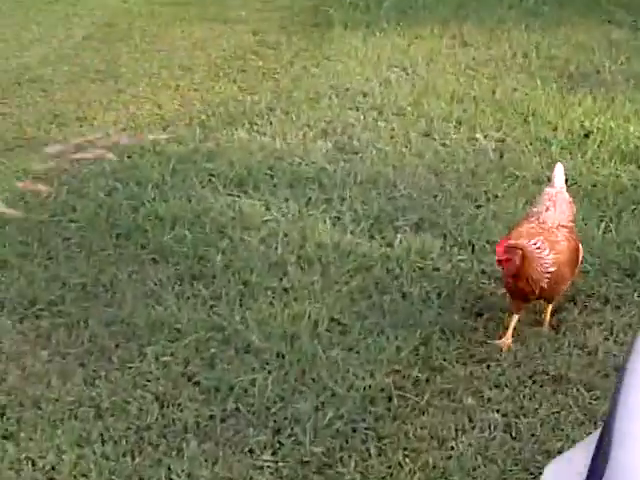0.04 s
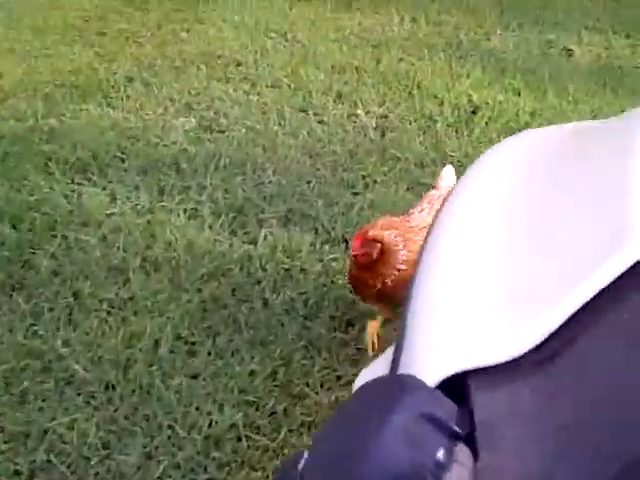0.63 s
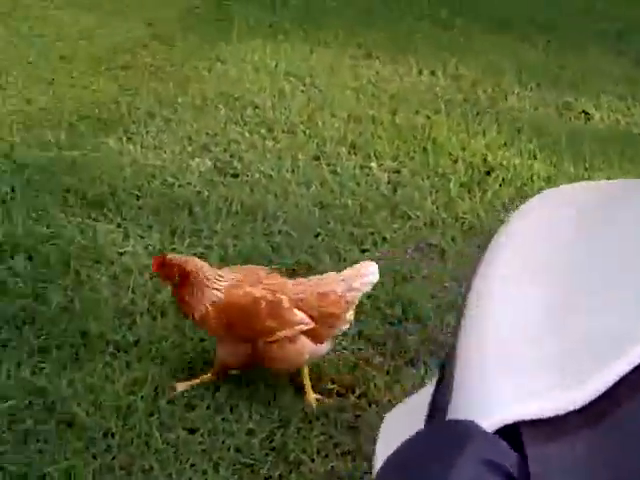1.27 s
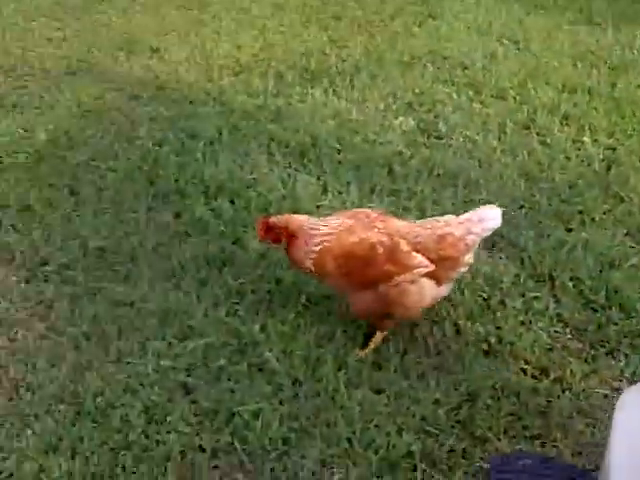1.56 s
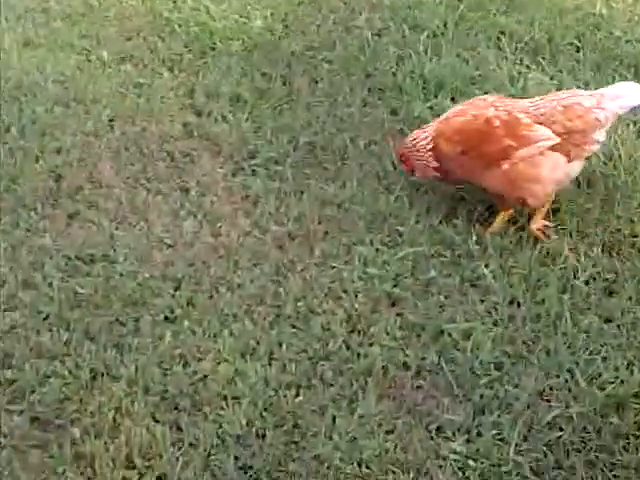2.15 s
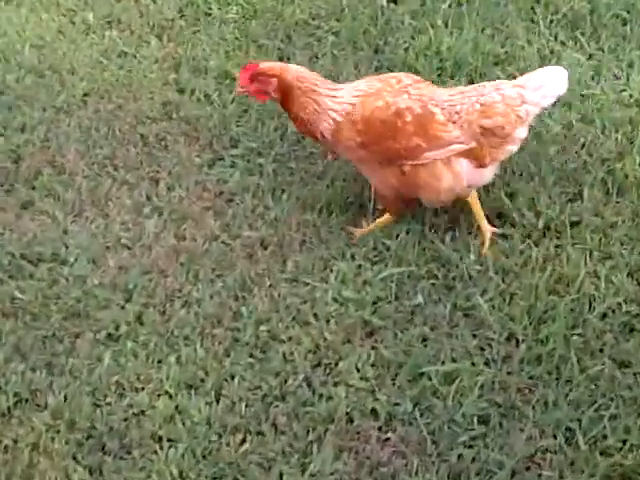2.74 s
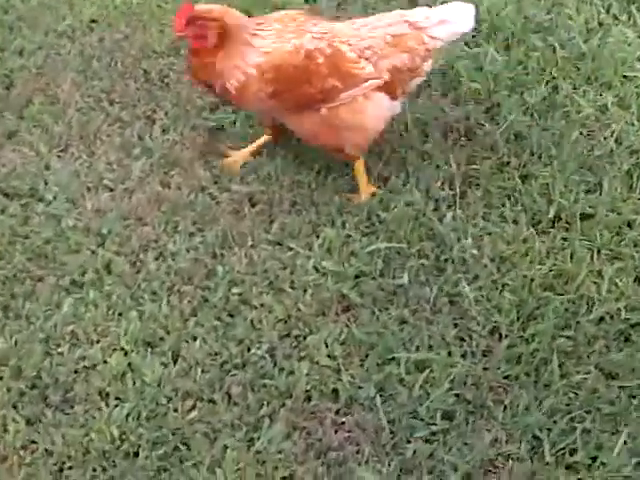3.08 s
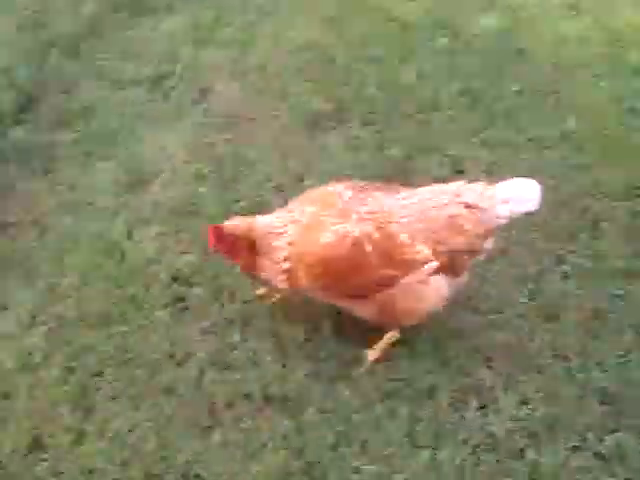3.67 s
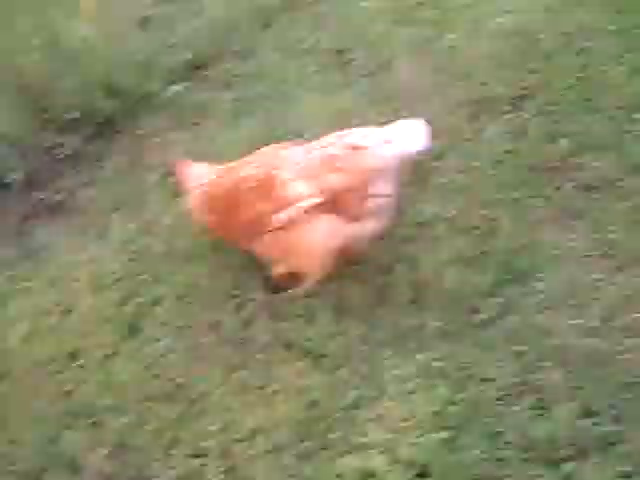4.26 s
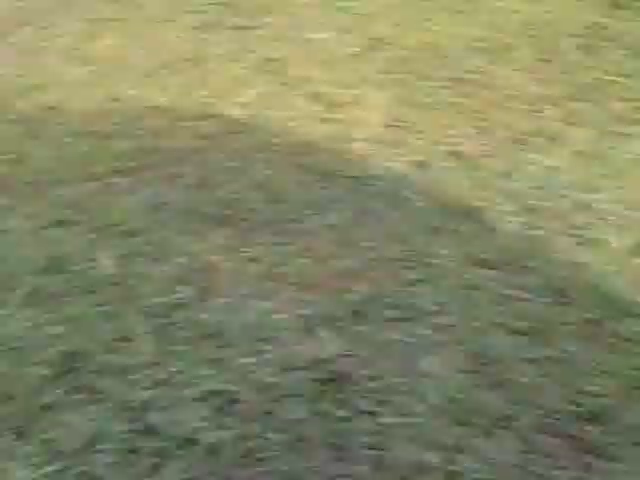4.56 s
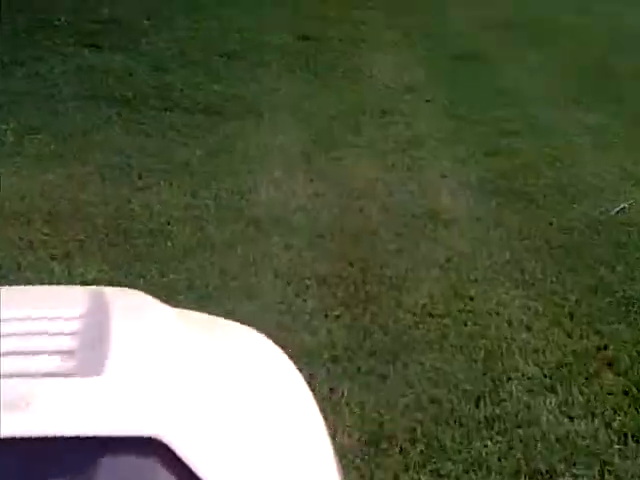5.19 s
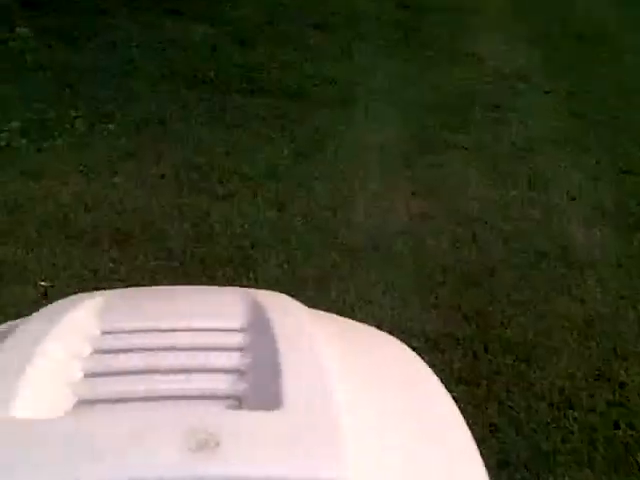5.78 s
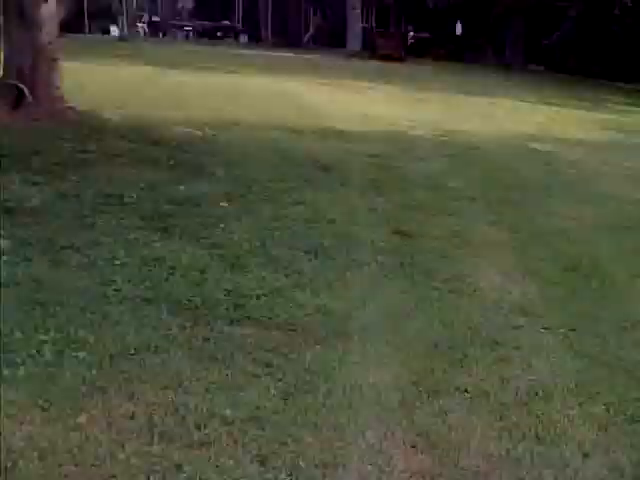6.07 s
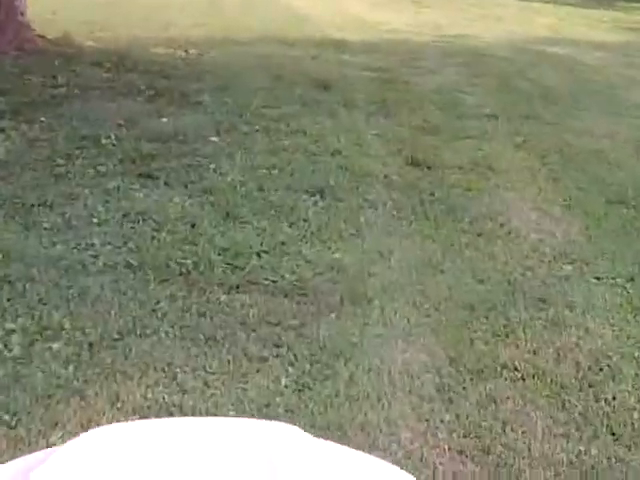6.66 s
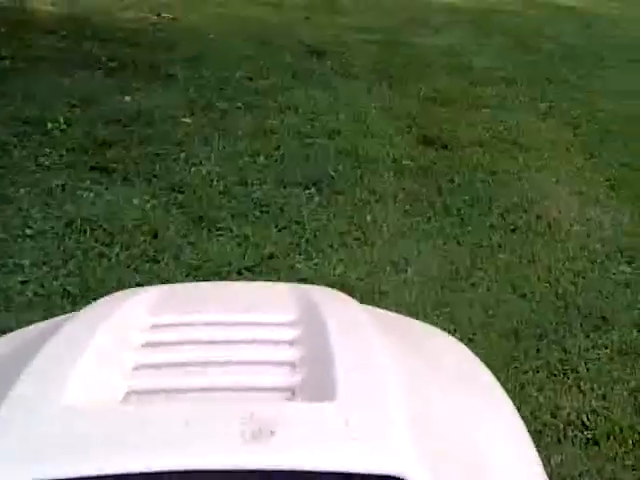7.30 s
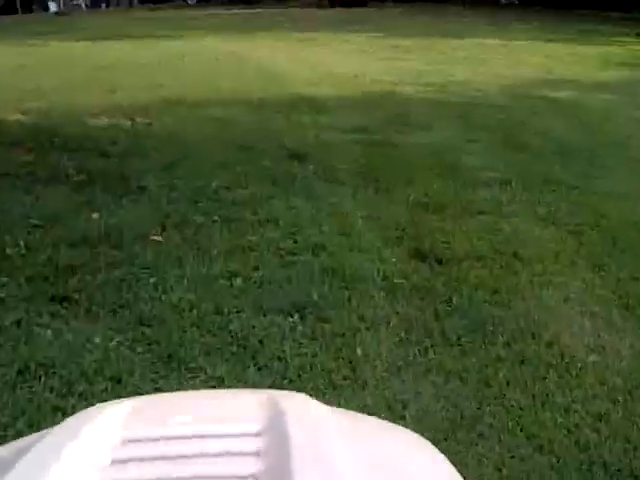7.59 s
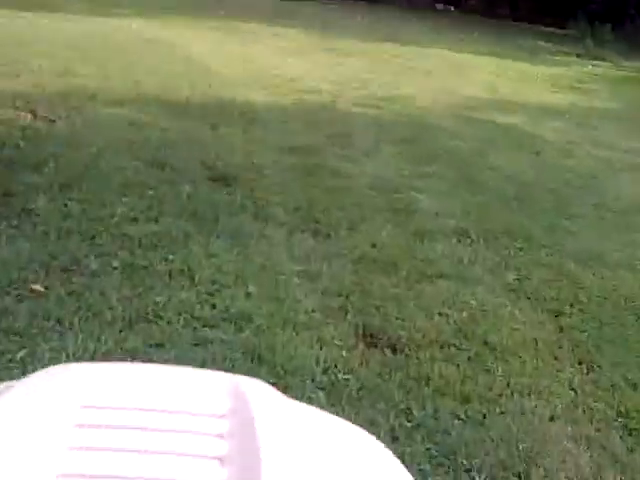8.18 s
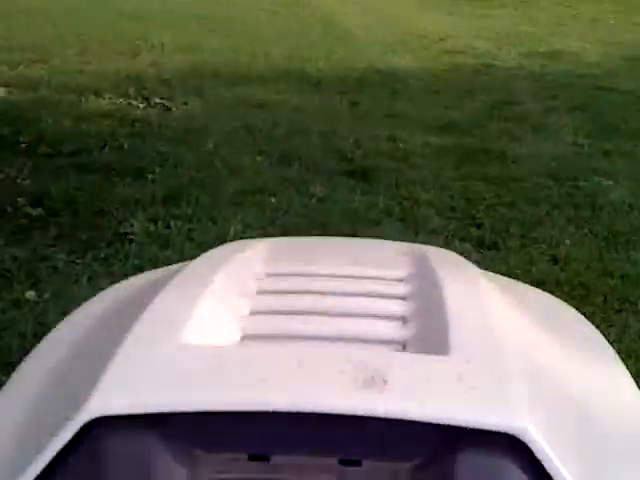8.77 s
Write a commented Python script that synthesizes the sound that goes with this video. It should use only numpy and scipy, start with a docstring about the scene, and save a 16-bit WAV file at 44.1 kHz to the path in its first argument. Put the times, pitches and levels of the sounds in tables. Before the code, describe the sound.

A riding lawn mower drones steadily as it cuts grass, its engine chugging and knocking against the hood in the second half.

```python
"""A riding mower cuts a lawn. From the start, heard over its side, the two-cylinder engine and the
belt-driven blades beat against each other in a rush of air; the governor lets the speed sag a little
in thicker grass. Around 4 s the microphone dips toward the cutting deck, where panels sing and debris
ticks. By 5 s it has come up to the seat behind the hood: the engine chugs, a pulley hums louder, and
hard firings, alone or in runs, knock the hood."""
import sys
import numpy as np
from scipy import signal
from scipy.fft import rfft, irfft
from scipy.io import wavfile
from scipy.ndimage import uniform_filter1d, minimum_filter1d

SR = 44100
rng = np.random.default_rng(int(sys.argv[2]) if len(sys.argv) > 2 else 0)


def pcm_store(signal):
    """Save signal as 16-bit PCM."""
    levels = np.round(np.clip(np.atleast_2d(signal), -1, 1) * 32767)
    wavfile.write(sys.argv[1], SR, levels.astype(np.int16).T)


N = 398663
TIME = np.arange(N) / SR
CONTROL_TIME = TIME[::256]

# governed engine speed, two crank turns to a cycle: (time [s], cycle rate [Hz])
ENGINE_SPEED = [(0.0, 26.25), (1.0, 26.61), (2.01, 26.26), (2.76, 26.31), (3.26, 25.7), (4.02, 26.2),
                (4.52, 25.84), (5.02, 25.85), (5.27, 25.43), (5.78, 25.98), (6.28, 25.94), (6.53, 25.62),
                (6.78, 25.53), (7.03, 25.72), (7.28, 25.66), (7.53, 25.83), (8.79, 25.92), (9.04, 25.66)]
# the microphone's move, both 0 at the side: (time [s], nearness to deck [0-1], nearness to seat [0-1])
MIC_PATH = [(0, 0, 0), (1.2, 0, 0), (1.7, 0, 0.01), (2.8, 0.18, 0.04), (3.5, 0.2, 0.22), (3.8, 0.53, 0.1),
            (4.15, 1, 0.2), (4.45, 0.7, 0.16), (4.7, 0.2, 0.27), (5.05, 0, 0.76), (9.04, 0, 0.76)]
# firings that knock the hood: (time [s], firings in a row [count], strike level [dB])
HARD_FIRINGS = [(4.914, 1, -13), (5.022, 1, -11.5), (5.292, 1, -12.5), (5.408, 1, -10), (5.488, 1, -10.5),
                (5.610, 1, -12.5), (5.684, 2, -12.5), (5.836, 3, -9.8), (6.034, 1, -13), (6.221, 1, -11),
                (6.337, 1, -12), (6.452, 3, -13), (6.612, 1, -14), (6.729, 4, -11.5), (7.002, 2, -11.5),
                (7.158, 1, -11), (7.547, 2, -13), (7.740, 1, -12.5), (7.972, 1, -12), (8.088, 6, -11.5),
                (8.356, 1, -10.5), (8.435, 1, -12), (8.627, 1, -12), (8.706, 2, -13), (8.942, 2, -15)]
MEAN_CYCLE_HZ = np.mean(ENGINE_SPEED, 0)[1]


def amp(db):
    return 10 ** (np.asarray(db) / 20)


def unit(x):
    return x / np.sqrt(np.mean(x ** 2) + 1e-20)


def curves(rows, t):
    """Automation: each value column of a table, joined by straight lines in time."""
    times, *columns = np.transpose(rows)
    return [np.interp(t, times, column) for column in columns]


def spectrum(points, hz):
    """An EQ curve, joined by straight lines over log frequency."""
    point_hz, db = np.transpose(points)
    return np.interp(np.log(hz + 1), np.log(point_hz + 1), db)


def wander(rate_hz, size=2048):
    """Smooth random modulation of unit RMS, up to about the given rate."""
    hz = np.fft.rfftfreq(size, TIME[-1] / size)
    slow = irfft(rfft(rng.standard_normal(size)) / (1 + (hz / rate_hz) ** 4))
    return np.interp(TIME, np.linspace(0, TIME[-1], size), unit(slow))


def band_swells_db(t, hz, blur_hz=0):
    """Timed boosts and cuts: single engine and blade tones, and bands of the rush, swell or fade."""
    # (time [s], half duration [s], centre [Hz], width [Hz], boost or cut [dB])
    band_swells = [(.5, .7, 510, 50, -2.5), (.69, .6, 1330, 70, 2), (.7, 1, 1760, 230, -3.5),
                   (.8, .9, 2620, 110, 5), (.9, .46, 580, 22, 8), (1.1, .5, 636, 20, 5),
                   (2.1, .75, 738, 20, 12.5), (2.5, .64, 452, 24, 3.5), (2.6, .44, 1430, 80, 4),
                   (2.6, .95, 625, 14, -6.5), (2.95, .35, 365, 36, -4.5), (3.15, .39, 660, 50, 9.5),
                   (3.25, .45, 4430, 130, 8), (3.3, .35, 1810, 60, 5), (3.3, .3, 2230, 160, 2),
                   (3.4, .55, 3910, 170, 7.5), (3.4, .6, 538, 16, 7), (4.1, .42, 885, 36, 6.5),
                   (4.16, .57, 1520, 65, 6.5), (4.18, .43, 417, 15, 7), (4.2, .5, 626, 24, 4),
                   (4.23, .4, 3760, 170, 10), (4.25, .65, 834, 22, 12), (4.4, .35, 362, 24, 4),
                   (5.4, .5, 1750, 500, -2.5), (5.4, .3, 615, 30, -4), (6.05, .3, 830, 20, 7),
                   (7.1, .22, 873, 16, 6), (7.3, .3, 990, 47, 2.5), (7.35, .2, 823, 20, 12),
                   (8.15, .25, 826, 16, 7)]
    lift_db = 0
    for at, span, centre, width, db in band_swells:
        caught = width / (width + blur_hz)  # a narrow band catches less of a blurred sound
        fade = np.exp(-((t - at) / span) ** 4)
        lift_db += db * caught * fade / (1 + (2 * (hz - centre) / width) ** 2)
    return lift_db


def engine(cycles, seat, waver_db=1.23, scatter=0.44):
    """Harmonics of the firing cycle; at the seat the high ones land nearly in step, one chug a cycle."""
    # exhaust and block tones: (multiple of the cycle rate, side level [dB], seat level [dB])
    engine_tones = [(2, -45.5, -43.5), (3, -46, -52), (4, -42, -40.5), (5, -37, -34), (6, -37.5, -41),
                    (7, -36, -37.5), (8, -31, -30.5), (9, -37.5, -37.5), (10, -37, -47.5), (11, -33, -28.5),
                    (12, -45, -40.5), (13, -40.5, -40.5), (14, -28, -41.5), (15, -46, -44),
                    (16, -38.5, -43.5), (17, -38.5, -31), (20, -40, -49.5), (21, -38.5, -44),
                    (22, -41, -38), (23, -48, -36.5), (24, -36.5, -32), (25, -41, -46), (26, -42.5, -39.5),
                    (27, -47.5, -37.5), (28, -43.5, -49.5), (29, -42.5, -52.5), (32, -50.5, -45),
                    (34, -39.5, -43), (39, -47.5, -57), (40, -41.5, -45), (42, -43.5, -48)]
    out = np.zeros(N)
    cycle_hz = curves(ENGINE_SPEED, CONTROL_TIME)[0]
    for order, side_db, seat_db in engine_tones:
        db = side_db + seat * (seat_db - side_db) + waver_db * wander(3.2)
        db += np.interp(TIME, CONTROL_TIME, band_swells_db(CONTROL_TIME, order * cycle_hz))
        detour = rng.uniform(-.5, .5) * (order > 7) * (1 - seat * min(order / 18, 1))
        phase = 2 * np.pi * (order * cycles + scatter * rng.random() + detour)
        out += amp(db) * np.cos(phase + .15 * wander(6))
    return np.sqrt(2) * out


def exhaust(cycles, seat, lead_cycles=0.046, decay_cycles=0.17, uneven_db=2.0, side_db=-41, seat_db=-32):
    """One cylinder barks louder: each cycle a puff of gas of uneven size rings the muffler."""
    # muffler resonances: (centre [Hz], width [Hz], gain [dB])
    muffler = [(338, 180, -1.5), (615, 52, 6.5), (845, 51, -7.5), (1090, 99, -8.5)]
    count, age = np.divmod(cycles + 1 + lead_cycles, 1)
    sizes = amp(uneven_db * np.clip(rng.standard_normal(512), -2, 2))
    puffs = sizes[count.astype(int)] * np.exp(-age / decay_cycles) * rng.standard_normal(N)
    ring = sum(amp(db) * signal.lfilter(*signal.iirpeak(hz, hz / width, fs=SR), puffs)
               for hz, width, db in muffler)
    muffled = signal.sosfilt(signal.butter(3, 1500, fs=SR, output="sos"), ring)
    return amp(side_db + seat * (seat_db - side_db)) * unit(muffled)


def blades(cycles, deck, seat, passes_per_cycle=3.4605, lead_passes=0.571, smear=0.33):
    """Pressure dips as each blade tip passes, sharpest close to the deck."""
    # blade hum, one curve for each of the first three harmonics: (time [s], level [dB])
    hum_curves = [
        [(0, -27), (.6, -28), (1.2, -26.5), (2.0, -29), (2.6, -30.5), (3.4, -32.5), (5.0, -32), (5.6, -30),
         (6.6, -30.5), (7.8, -27.5), (9.0, -29.5)],
        [(0, -24), (.2, -23), (.6, -23.2), (1.2, -20.3), (1.8, -24.3), (2.2, -22.6), (2.6, -22.8), (3.1, -21.5),
         (3.55, -21), (4.2, -22.5), (5.0, -23.5), (5.6, -22.5), (5.85, -25), (6.05, -20.5), (6.6, -23),
         (7.1, -24.5), (7.9, -28.5), (8.75, -25), (8.9, -20.5), (9.04, -23)],
        [(0, -30), (.3, -25), (.62, -20.8), (.82, -26), (1.0, -23.5), (1.2, -27.5), (1.95, -24.5),
         (2.15, -26.5), (2.3, -38), (2.5, -27), (2.72, -21.5), (2.95, -27), (3.15, -25), (3.35, -32),
         (3.65, -24), (3.85, -26), (4.05, -23.8), (4.27, -29), (4.7, -25.5), (5.15, -21.5), (5.55, -28),
         (6.3, -28), (6.6, -23), (7.1, -27), (7.55, -23), (7.85, -27), (8.1, -24), (8.4, -23.5), (8.55, -30),
         (8.8, -25), (9.04, -26)],
    ]
    # weaker harmonics: (multiple of the pass rate, side level [dB], deck level [dB], seat level [dB])
    overtones = [(4, -38, -33.5, -37), (5, -35.5, -36, -36), (6, -41, -45, -49), (10, -49, -48, -53.5)]
    # the belt gears the second harmonic just under the engine's seventh: they beat twice a second
    passes = passes_per_cycle * cycles + lead_passes
    pass_hz = passes_per_cycle * curves(ENGINE_SPEED, CONTROL_TIME)[0]
    levels = [(k, curves(hum, TIME)[0]) for k, hum in enumerate(hum_curves, 1)]
    for k, side_db, deck_db, seat_db in overtones:
        db = (side_db + deck * (deck_db - side_db)) * (1 - seat) + seat * seat_db
        db += np.interp(TIME, CONTROL_TIME, band_swells_db(CONTROL_TIME, k * pass_hz))
        levels.append((k, db))
    out = np.zeros(N)
    for k, db in levels:
        detour = smear * rng.uniform(-1.26, 1) * (k > 2) * (1 - deck)  # short waves go via the housing
        jitter = k * .016 * wander(9.5)  # turbulence shakes the higher harmonics more
        flutter_db = k * .33 * wander(5)
        out -= amp(db + flutter_db) * np.cos(2 * np.pi * (k * passes + detour) + jitter)
    return np.sqrt(2) * out


def pulley(cycles, seat, order=17.15, side_db=-50, seat_db=-36, waver_db=3.0):
    """A belt pulley under the seat hums at its own multiple of the engine speed."""
    db = side_db + seat * (seat_db - side_db) + waver_db * wander(5.3)
    phase = 2 * np.pi * order * cycles + .25 * wander(5)
    return np.sqrt(2) * amp(db) * np.cos(phase)


def clatter(cycles, size=8192, low_order=30, high_order=120):
    """Valve gear and fan repeat one bright, irregular pattern every engine cycle."""
    order = np.arange(size // 2 + 1)
    harmonics = np.exp(2j * np.pi * rng.random(len(order))) * (order >= low_order) * (order < high_order)
    pattern = irfft(harmonics) * size / np.sqrt(SR / MEAN_CYCLE_HZ)
    return np.interp(cycles % 1 * size, np.arange(size), pattern)


def grass_db(t, uneven_db=0.5, uneven_hz=19):
    """Grass lifts the swish: a swell for each thick tuft, a flicker for the uneven lawn between."""
    # thick tufts: (middle [s], length [s], treble lift [dB])
    tufts = [(0.073, 0.19, 2.5), (1.583, 0.31, 1.5), (1.91, 0.23, 1.5), (2.37, 0.24, 1), (2.87, .06, 3),
             (3.33, 0.26, 1.5), (3.655, .05, 3), (3.75, 0.11, 2.5), (4.365, .09, 4.5), (4.418, 0.041, 4),
             (5.85, 0.069, 2), (6.37, 0.1, 1.5), (6.6, .08, 1.5), (6.89, 0.23, 1.3), (7.835, 0.27, 2.1),
             (8.119, .21, 1.5)]
    swells = sum(db * .5 ** ((2 * (t - at) / length) ** 2) for at, length, db in tufts)
    return swells - swells.mean() + uneven_db * np.interp(t, TIME, wander(uneven_hz))


def rush(cycles, seat, clatter_side=0.36, clatter_seat=0.28, patch_db=0.9, swish_hz=600):
    """Turbulent air from blades and cooling fan, with clatter, coloured by the microphone's position."""
    # the air's tone at the side, the deck and the seat: (frequency [Hz], noise density [dB per Hz])
    side_eq = [(20, -68.5), (65, -67), (110, -65), (200, -47), (330, -48), (490, -55), (800, -54.5),
               (1300, -55.5), (2600, -62.5), (3100, -72), (3900, -71.5), (5200, -78.5), (6600, -89.5),
               (7400, -100)]
    deck_eq = [(20, -67.5), (65, -64), (110, -62.5), (200, -61), (350, -52.5), (490, -57.5), (800, -57),
               (1500, -56.5), (2600, -65), (3150, -75), (4400, -81), (5300, -76), (6600, -75.5),
               (7400, -96)]
    seat_eq = [(20, -68), (65, -69), (110, -55.5), (200, -45.5), (330, -43.5), (500, -55.5), (1000, -55),
               (1500, -60), (2600, -65.5), (3150, -72.5), (3900, -76.5), (5200, -83.5), (6600, -96.5),
               (7400, -103)]
    air = rng.standard_normal(N) + (clatter_side + seat * (clatter_seat - clatter_side)) * clatter(cycles)
    hz, t, bands = signal.stft(air, SR, nperseg=2048, noverlap=1536)
    hz = hz[:, None]
    near_deck, near_seat = np.clip(curves(MIC_PATH, t), 0, 1)
    db = spectrum(side_eq, hz) * (1 - near_deck) + spectrum(deck_eq, hz) * near_deck
    db = db * (1 - near_seat) + spectrum(seat_eq, hz) * near_seat
    db += band_swells_db(t, hz, blur_hz=40)
    db += grass_db(t) * hz / (hz + swish_hz)
    patches = uniform_filter1d(rng.standard_normal(db.shape), size=14, axis=0)
    db += patch_db * unit(uniform_filter1d(patches, size=8, axis=1))  # the colour shimmers
    air = np.sqrt(SR / 2) * signal.istft(bands * amp(db), SR, nperseg=2048, noverlap=1536)[1][:N]
    return air * amp(.8 * wander(22))  # eddies under the deck shake all of it at once


def intake(air, cycles, deck, peak_phase=0.34, body=0.11, hiss=0.22, deck_hiss=0.2, split_hz=4800):
    """The rush swells once a cycle as the engine draws air, its hiss most of all."""
    swell = np.cos(2 * np.pi * (cycles - peak_phase))
    treble = signal.sosfiltfilt(signal.butter(3, split_hz, "high", fs=SR, output="sos"), air)
    return (air - treble) * (1 + body * swell) + treble * (1 + (hiss + deck_hiss * deck) * swell)


def panel_whines(cycles, waver_db=.7, blur=.006, blur_hz=22):
    """Shroud and deck panels sing as the microphone passes; shaking blurs the higher tones more."""
    # sheet-metal tones: (time [s], half duration [s], multiple of the cycle rate, level [dB])
    whines = [(.7, 1.1, 50, -38.5), (1.95, .75, 56, -40.5), (3.3, .33, 70, -37), (3.3, .42, 172, -55),
              (3.35, .5, 152, -53.5), (3.8, .8, 96, -47.5), (4.12, .6, 58, -33.8), (4.15, .35, 79, -45),
              (4.52, .24, 70, -41), (6.95, .3, 48, -39)]
    out = np.zeros(N)
    for at, span, order, db in whines:
        near = abs(TIME - at) < 2 * span
        fade = np.exp(-((TIME[near] - at) / span) ** 4)
        phase = 2 * np.pi * (order * cycles[near] + rng.random()) + order * blur * wander(blur_hz)[near]
        out[near] += amp(db + waver_db * wander(6)[near]) * fade * np.cos(phase)
    return np.sqrt(2) * out


def chug(air, cycles, seat, peak_phase=.01, depth=.11, gap=.36, uneven_db=0.85, band_hz=(480, 1150)):
    """Behind the hood the rush's mids pump with the loud cylinder and duck between hard firings."""
    mids = signal.sosfiltfilt(signal.butter(2, band_hz, "band", fs=SR, output="sos"), air)
    period = 1 / MEAN_CYCLE_HZ
    hard = sum((TIME > at - period / 2) & (TIME < at + count * period) for at, count, _ in HARD_FIRINGS)
    labouring = uniform_filter1d(np.minimum(hard, 1.), size=600)
    stroke = np.cos(2 * np.pi * (cycles - peak_phase))
    pump = (1 + depth * stroke - gap * labouring * (1 - stroke) / 2) * amp(uneven_db * wander(13.0))
    return air + seat * mids * (pump - 1)


def debris(band_hz=(800, 4800), trim_db=-3):
    """Twigs strike the deck with short, dry cracks."""
    # (time [s], level before trim [dB], decay [s])
    strikes = [(3.910, -27, 0.011), (4.365, -34, .014), (4.408, -37, 0.015), (5.865, -39, .015),
               (6.357, -28, .01)]
    envelope = sum(amp(db) * (TIME >= at) * np.exp(-abs(TIME - at) / decay) for at, db, decay in strikes)
    crack = signal.sosfilt(signal.butter(3, band_hz, "band", fs=SR, output="sos"), rng.standard_normal(N))
    return amp(trim_db) * envelope * unit(crack)


def hood_knocks(detune=0.075, attack_s=.002):
    """Each hard firing rings the hood, a little differently every time; in a run, one cycle apart."""
    # hood resonances: (frequency [Hz], relative level [dB], decay [s])
    hood_modes = [(297, -6, .008), (435, -4.5, .007), (590, -4, .007), (740, -7, .0065), (930, -8, .006),
                  (1200, -12, .005), (1760, -17, .004)]
    out, t = np.zeros(N), TIME[:4096]
    attack = np.minimum(t / attack_s, 1)
    for start, count, strike_db in HARD_FIRINGS:
        for at in start + np.arange(count) / curves(ENGINE_SPEED, start)[0]:
            ring = np.zeros(len(t))
            for hz, db, decay in hood_modes:
                tuning, half_turns = rng.uniform(-1.04, 1, 2)
                phase = 2 * np.pi * hz * (1 + detune * tuning) * t + np.pi * half_turns
                ring += amp(db) * np.exp(-t / decay) * np.sin(phase)
            slot = out[round(at * SR):][:len(t)]
            slot += (amp(strike_db) * attack * ring)[:len(slot)]
    return out


def scene():
    """Engine, blades and pulley turn together, joined by the belt; the mix is mono."""
    # the loud cylinder fires near whole numbers of this count
    cycles = np.cumsum(curves(ENGINE_SPEED, TIME)[0]) / SR - .6
    deck, seat = np.clip(curves(MIC_PATH, TIME), 0, 1)
    air = intake(rush(cycles, seat), cycles, deck)
    air = chug(air, cycles, seat)
    tones = engine(cycles, seat) + blades(cycles, deck, seat) + pulley(cycles, seat)
    tones += panel_whines(cycles)
    return (tones + exhaust(cycles, seat) + air + debris() + hood_knocks())[None]


def record(dry):
    """A quick limiter holds the peaks; a steep low-pass takes off the top."""
    ceiling, cutoff_hz = .49, 7450
    gain = np.minimum(1, ceiling / (abs(dry) + 1e-9))
    gain = uniform_filter1d(minimum_filter1d(gain, size=300), size=300)
    lowpass = signal.firwin(201, cutoff_hz, window=("kaiser", 8), fs=SR)
    return signal.oaconvolve(dry * gain, lowpass[None], "same")


dry = scene()
out = record(dry)
pcm_store(out)
```